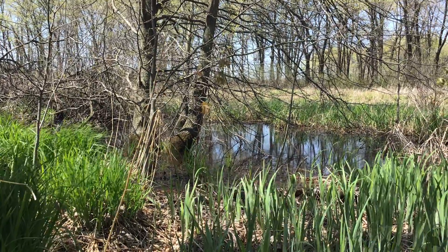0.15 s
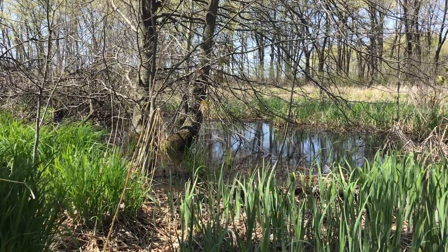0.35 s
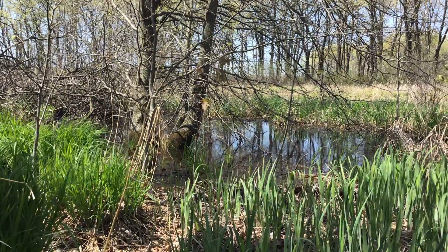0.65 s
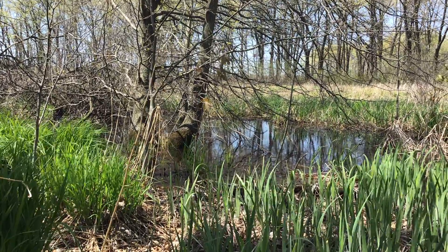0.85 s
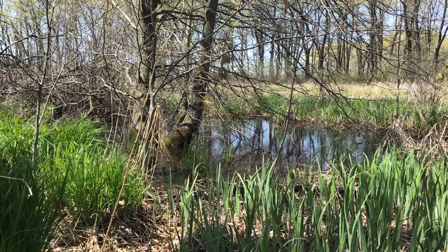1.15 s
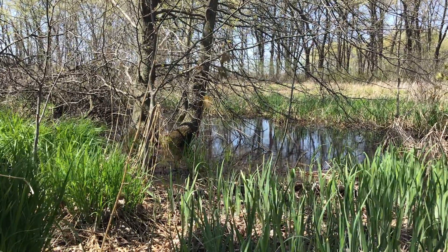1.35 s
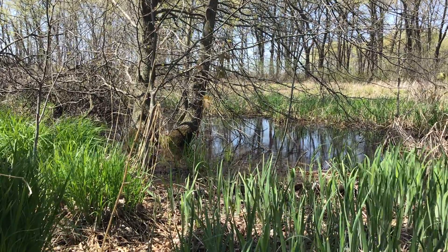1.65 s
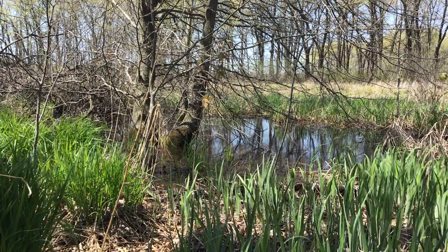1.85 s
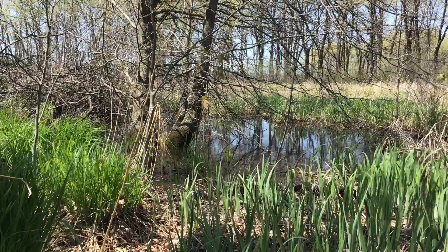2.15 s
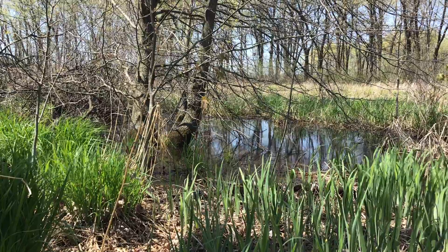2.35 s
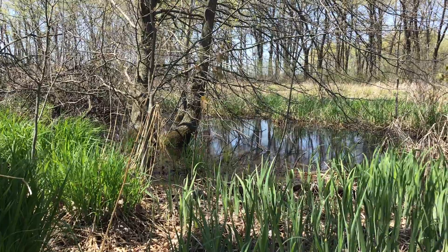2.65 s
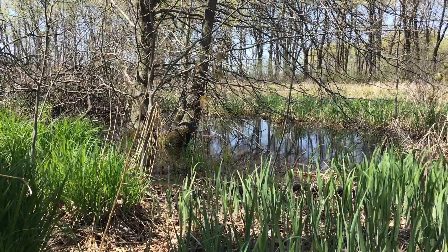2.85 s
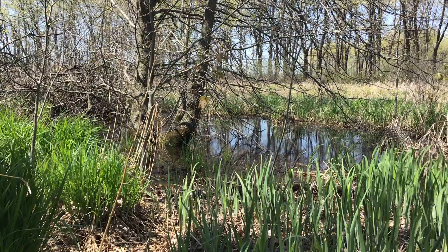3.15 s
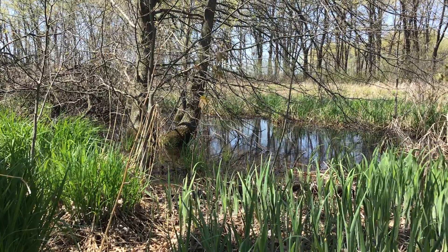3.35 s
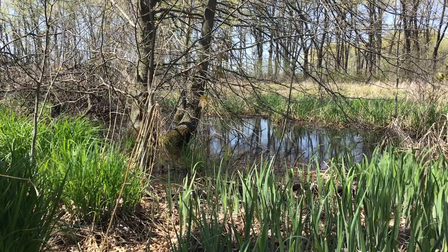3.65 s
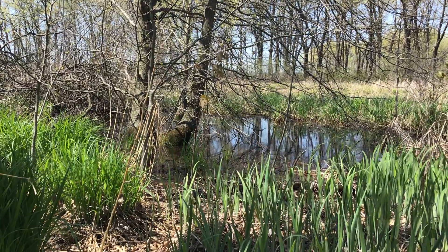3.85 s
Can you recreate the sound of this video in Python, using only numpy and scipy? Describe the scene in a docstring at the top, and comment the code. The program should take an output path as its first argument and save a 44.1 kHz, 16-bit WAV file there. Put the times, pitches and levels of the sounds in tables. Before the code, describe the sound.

Chorus frogs creak from the far edge of a woodland pond, repeated short click runs slowing, swelling and rising; low gusts buffet the microphone, with faint traffic wash, rustling reeds and tiny bird notes.

```python
"""Chorus frogs creak at the far edge of a woodland pond: each call is a run of clicks that slows, swells and
rises in pitch. Each click is a briefly ringing tone; filtered noise makes the gusts that buffet the microphone,
the faint wash of distant traffic, the far chorus and the rustling reeds, where dry stalks tick.
A few small birds are gliding tones. Decaying noise echoes blur birds and frogs as the trees would."""
import sys
import numpy as np
from scipy import signal
from scipy.fft import rfft, irfft
from scipy.io import wavfile
from scipy.ndimage import uniform_filter1d

SR = 44100
rng = np.random.default_rng(int(sys.argv[2]) if len(sys.argv) > 2 else 0)


def log_audio(samples):
    """Write samples as a 16-bit WAV file to the path given in sys.argv[1]."""
    # one column per channel
    frames = np.atleast_2d(samples).T
    # limit to full scale, then quantise
    limited = np.clip(frames, -1, 1)
    pcm = np.round(limited * 32767).astype(np.int16)
    wavfile.write(sys.argv[1], SR, pcm)


N = 176400
T = np.arange(N) / SR


def from_db(db):
    """Amplitude ratio: twenty decibels are a factor of ten."""
    return 10 ** (np.asarray(db) / 20)


def unit_power(x):
    """Normalization: scale a signal to a mean square of one."""
    return x / np.sqrt(np.mean(x ** 2) + 1e-20)


def curves_in_time(rows):
    """Linear interpolation: join the points of each column by straight lines over time."""
    seconds, *columns = np.transpose(rows)
    return [np.interp(T, seconds, column) for column in columns]


def colored_noise(spectrum):
    """Spectral shaping: white noise is weighted by frequency, then brought to unit power."""
    hz, db = np.transpose(spectrum)
    bins = np.maximum(np.fft.rfftfreq(N, 1 / SR), 1)
    gain = from_db(np.interp(np.log(bins), np.log(hz), db))
    # beyond either end of the curve the level falls 12 dB per octave
    skirts = np.minimum(bins / hz[0], 1) ** 2 * np.minimum(hz[-1] / bins, 1) ** 2
    white = rng.standard_normal(N)
    return unit_power(irfft(rfft(white) * gain * skirts, N))


def add(out, start_s, sound):
    """Superposition: sounds sum where they overlap; one that starts outside the scene is left out."""
    i = int(start_s * SR)
    if 0 <= i < N:
        out[i:i + len(sound)] += sound[:N - i]


WOODS_T60_S, WOODS_DELAY_S = 0.4, 0.003
BANK_ECHO_S, BANK_SHARE = 0.008, 0.11  # decay time constant, share of the echo power


def woods(x):
    """Reverberation by convolution: quick echoes off the bank, then a long scatter from the trunks."""
    t = T[:SR]
    near, far = rng.standard_normal((2, SR))
    bank = unit_power(near * np.exp(-t / BANK_ECHO_S))
    trunks = unit_power(far * from_db(-60 * t / WOODS_T60_S))
    echoes = np.sqrt(BANK_SHARE) * bank + np.sqrt(1 - BANK_SHARE) * trunks
    wet = signal.fftconvolve(x, echoes / np.sqrt(SR))[:N]
    return np.interp(T - WOODS_DELAY_S, T, wet, left=0)


# A click starts above its nominal pitch and sinks to a little under it.
CLICK_SAG_HZ, CLICK_SAG_S, CLICK_REST_HZ = 623, 0.002, 187
CLICK_RISE_S, CLICK_DECAY_S = 0.0022, 0.0026
OVERTONE_RATIO, OVERTONE_DB = 1.55, -20.5


def click(hz):
    """Damped resonance: a snap of the larynx rings the vocal sac, sagging in pitch, with a weak overtone."""
    t = T[:SR // 40]
    sagging_hz = hz - CLICK_REST_HZ + CLICK_SAG_HZ * np.exp(-t / CLICK_SAG_S)
    phase = 2 * np.pi * np.cumsum(sagging_hz) / SR
    rise = np.sin(np.pi / 2 * np.minimum(t / CLICK_RISE_S, 1)) ** 2
    shape = rise * np.exp(-np.maximum(t - CLICK_RISE_S, 0) / CLICK_DECAY_S)
    overtone = from_db(OVERTONE_DB) * shape ** 2 * np.sin(OVERTONE_RATIO * phase)
    return shape * np.sin(phase) + overtone


PITCH_BEND = 2.3  # exponent: the pitch climbs faster late in the call
CLICK_LEAD_S = 0.0022  # a click begins this long before its tabled time
FROG_TRIM_DB, FROG_ECHO_TRIM_DB = 0.5, -5  # added to the levels of every call
# Frog calls. Each row: time of the first click in seconds, number of clicks, first gap in seconds,
# growth of the gap per click as a factor, longest gap in seconds, first pitch in Hz, last pitch in Hz,
# direct level in dB and echo level in dB, both before the trims.
FROG_CALLS = [ (-.29, 12, .031, 1.07, .042, 3500, 3780, -54, -45.5),
              (.3402, 12, .0297, 1.070, .0483, 3320, 3640, -39, -44.5),
              (.88, 15, .031, 1.07, .039, 3600, 3830, -55, -44),
              (1.5543, 12, .0298, 1.071, .0495, 3310, 3630, -38.5, -44),
              (2.2209, 8, .0298, 1.10, .0410, 3400, 3750, -48, -50),
              (2.27, 14, .026, 1.04, .031, 3580, 3850, -58, -44),
              (2.9507, 8, .0396, 1.095, .0513, 3320, 3640, -44, -46),
              (3.43, 13, .030, 1.07, .042, 3500, 3820, -53, -48)]
# Loudness through a call. Each row: share of the call from 0 to 1, level in dB.
CALL_SWELL = [(0, -13.5), (.25, -10), (.5, -5), (.75, -1), (.9, -3.5), (1, -7.5)]


def frogs():
    """Pulse trains with a direct-to-reverberant ratio: clicks slow, swell and climb; far frogs are mostly echo."""
    direct, scattered = np.zeros((2, N))
    for start_s, clicks, gap_s, growth, longest_s, first_hz, last_hz, direct_db, echo_db in FROG_CALLS:
        s = start_s - CLICK_LEAD_S
        for k, share in enumerate(np.linspace(0, 1, int(round(clicks)))):
            hz = first_hz + (last_hz - first_hz) * share ** PITCH_BEND
            swell_db = np.interp(share, *np.transpose(CALL_SWELL))
            sound = click(hz) * from_db(swell_db + rng.normal(0, 0.22))  # slightly uneven clicks
            add(direct, s, from_db(direct_db) * sound)
            add(scattered, s, from_db(echo_db) * sound)
            s += min(gap_s * growth ** k, longest_s)
    return from_db(FROG_TRIM_DB) * direct + from_db(FROG_ECHO_TRIM_DB) * woods(scattered)


EVEN_S = 0.041  # averaging window, applied twice


def eddies(spectrum):
    """Envelope flattening: turbulence divided by its running strength, ready to be shaped by the gusts."""
    x = colored_noise(spectrum)
    width = max(int(EVEN_S * SR), 2)
    power = uniform_filter1d(uniform_filter1d(x ** 2, width), width)
    return x / np.sqrt(power + 0.00093)  # the floor limits the boost of quiet moments


RUMBLE_TRIM_DB, FLUTTER_TRIM_DB = 0.5, -0.5
# Wind on the microphone. Each row: time in seconds, level of the low rumble in dB,
# level of the higher flutter in dB, both before the trims.
GUST_LEVELS = [(0.0, -38.5, -56.5), (0.05, -36.5, -40), (0.1, -35.5, -51), (0.11, -48, -47.5),
               (0.17, -42, -59), (0.2, -43.5, -48), (0.26, -46, -49.5), (0.28, -39, -39), (0.3, -30, -52),
               (0.32, -42.5, -62), (0.38, -27.5, -40), (0.41, -47, -51), (0.47, -30.5, -39.5),
               (0.48, -32.5, -48), (0.59, -39, -60), (0.6, -54, -54), (0.63, -25.5, -27), (0.67, -32, -64),
               (0.71, -50, -57), (0.78, -46, -71), (0.86, -37, -59), (0.92, -37, -45.5), (0.96, -45, -57),
               (0.98, -33.5, -64), (1.02, -38, -37.5), (1.09, -28.5, -38.5), (1.12, -35.5, -51.5),
               (1.19, -43, -56.5), (1.29, -39.5, -47.5), (1.32, -49, -57), (1.36, -49, -71),
               (1.39, -39.5, -57), (1.56, -52, -47), (1.59, -33, -49.5), (1.65, -45.5, -47),
               (1.69, -31.5, -68), (1.77, -47.5, -49.5), (1.84, -43, -66.5), (1.93, -59, -55.5),
               (1.96, -51, -60.5), (2.19, -52.5, -57), (2.27, -41, -40), (2.32, -38, -65),
               (2.34, -45.5, -57), (2.39, -28, -55), (2.42, -29, -30.5), (2.44, -41, -60.5),
               (2.48, -33.5, -47), (2.52, -49.5, -69.5), (2.77, -51, -60), (3.16, -49.5, -58.5),
               (3.19, -56.5, -56), (3.45, -50.5, -60), (3.48, -39, -57), (3.52, -59, -61), (3.55, -31, -43),
               (3.56, -29.5, -49), (3.61, -53, -61.5), (3.9, -52, -54), (4.0, -44, -62)]
# Color of the rumble. Each row: frequency in Hz, relative density in dB per Hz.
RUMBLE_SPECTRUM = [(25, -50), (40, -26), (52, -8.5), (68, 2), (95, 0.5), (130, -3), (170, -6.5),
                   (240, -18.5), (400, -40.5)]
# Color of the flutter. Each row: frequency in Hz, relative density in dB per Hz.
FLUTTER_SPECTRUM = [(100, -13), (160, -4), (220, 1), (310, -3.5), (480, -11), (650, -21), (850, -32),
                    (2000, -63)]


def wind():
    """Turbulent pressure noise: gusts rumble on the microphone; the sharper ones flutter higher up."""
    rumble_db, flutter_db = curves_in_time(GUST_LEVELS)
    rumble = from_db(rumble_db + RUMBLE_TRIM_DB) * eddies(RUMBLE_SPECTRUM)
    flutter = from_db(flutter_db + FLUTTER_TRIM_DB) * eddies(FLUTTER_SPECTRUM)
    high_pass = signal.butter(6, 44, "high", fs=SR, output="sos")
    return signal.sosfilt(high_pass, rumble + flutter)


TRAFFIC_DB = -56.5
# Color of the traffic. Each row: frequency in Hz, relative density in dB per Hz.
TRAFFIC_SPECTRUM = [(30, -8), (60, 3.5), (110, 5), (200, -5), (400, -4.5), (620, -2.5), (1000, -8),
                    (1600, -11.5), (2800, -16.5), (4300, -22.5), (5300, -25), (6800, -30), (9300, -29.5),
                    (12000, -36), (16000, -35)]


def traffic():
    """Sum of many incoherent sources: distant traffic merges into steady noise, strongest in the lows."""
    return from_db(TRAFFIC_DB) * colored_noise(TRAFFIC_SPECTRUM)


CHORUS_DB = -74
# Color of the far chorus. Each row: frequency in Hz, relative density in dB per Hz.
CHORUS_SPECTRUM = [(2800, -31), (3150, -4.5), (3400, 3.5), (3750, 1), (4100, -26.5), (4700, -24)]


def far_chorus():
    """Sum of many incoherent sources: the farthest frogs merge into a steady narrow band of noise."""
    return from_db(CHORUS_DB) * colored_noise(CHORUS_SPECTRUM)


TICK_DECAY_S = 0.004
# Color of the rustle. Each row: frequency in Hz, relative density in dB per Hz.
RUSTLE_SPECTRUM = [(3500, 18), (5500, -14), (9000, 2), (12000, -1), (16000, -11)]
# Rustling reeds. Each row: time in seconds, level in dB.
RUSTLE_LEVELS = [(0, -71.5), (.5, -76), (.82, -74), (1.05, -80), (1.5, -90), (1.65, -72), (2, -86),
                 (4, -78)]
# Dry ticks of the reeds. Each row: start in seconds, pitch in Hz, level in dB before the decay.
DRY_TICKS = [(.304, 10000, -67), (.359, 8840, -63.5), (1.160, 7800, -68)]


def reeds():
    """Friction and impact noise: a rustle of varying level with a few dry ticks, narrow bands that die fast."""
    rustle_db, = curves_in_time(RUSTLE_LEVELS)
    out = from_db(rustle_db) * colored_noise(RUSTLE_SPECTRUM)
    t = T[:SR // 20]
    for start_s, hz, db in DRY_TICKS:
        stalk = signal.butter(1, [hz * 0.98, hz * 1.07], "band", fs=SR, output="sos")
        ring = unit_power(signal.sosfilt(stalk, rng.standard_normal(len(t))))
        add(out, start_s, from_db(db) * ring * np.exp(-t / TICK_DECAY_S))
    return out


BIRD_SCATTER_PER_S, BIRD_ECHO_DB = 700, -2  # random pitch targets per second, echo gain
# Bird notes. Each row: start in seconds, length in seconds, first pitch in Hz, last pitch in Hz,
# random pitch scatter in Hz, peak level of the direct sound in dB.
NOTES_OF_BIRDS = [ (1.057, .030, 5700, 2485, 320, -54), (2.119, 0.084, 5200, 4240, 240, -70),
                  (2.14, 0.1, 2490, 2480, 8, -69.5), (2.492, 0.039, 4200, 4410, 230, -65),
                  (2.578, 0.032, 5000, 5640, 750, -64), (2.738, 0.046, 5640, 5160, 500, -63.5),
                  (2.777, 0.072, 4500, 4870, 260, -65), (2.822, 0.037, 5900, 5440, 470, -70),
                  (2.882, .04, 5200, 5030, 750, -68), (3.127, 0.088, 4650, 4500, 150, -71),
                  (3.545, .10, 4210, 3780, 28, -64), (3.947, .06, 4300, 4430, 310, -66.5)]


def birds():
    """Frequency modulation: short distant glides, pure where the pitch scatter is small, buzzy where large."""
    out = np.zeros(N)
    for start_s, length_s, first_hz, last_hz, scatter_hz, db in NOTES_OF_BIRDS:
        t = T[:int(length_s * SR)]
        targets = rng.standard_normal(SR // 100)
        waver = np.interp(t * BIRD_SCATTER_PER_S, np.arange(SR // 100), targets)
        hz = first_hz + (last_hz - first_hz) * t / length_s + scatter_hz * waver
        tone = np.sin(2 * np.pi * np.cumsum(hz) / SR)
        add(out, start_s, from_db(db) * np.sin(np.pi * t / length_s) * tone)
    return out + from_db(BIRD_ECHO_DB) * woods(out)


def scene():
    """Superposition: frogs, birds, reeds, wind, traffic and the far chorus add up in one channel."""
    return (frogs() + birds() + reeds() + wind() + traffic() + far_chorus())[None]


def record(dry):
    """Band limiting: a steep elliptic low-pass removes the top above 15.8 kHz."""
    low_pass = signal.ellip(12, .1, 70, 15800, fs=SR, output="sos")
    return signal.sosfilt(low_pass, dry)


dry = scene()
out = record(dry)
log_audio(out)
```